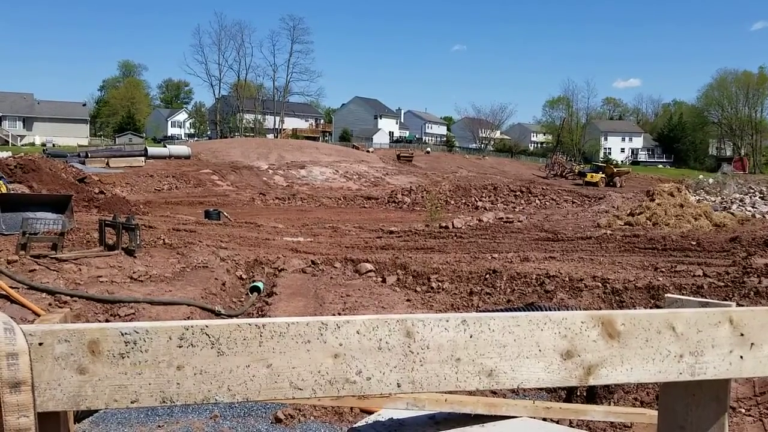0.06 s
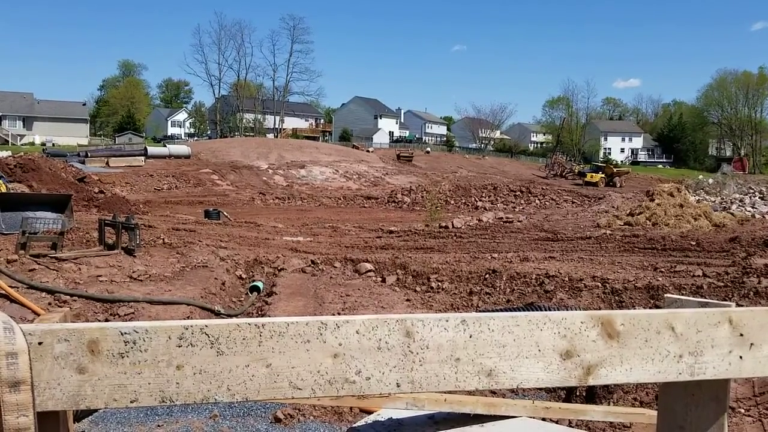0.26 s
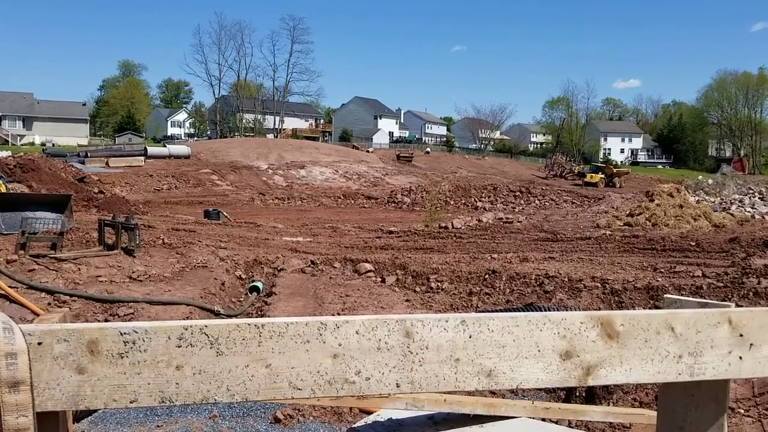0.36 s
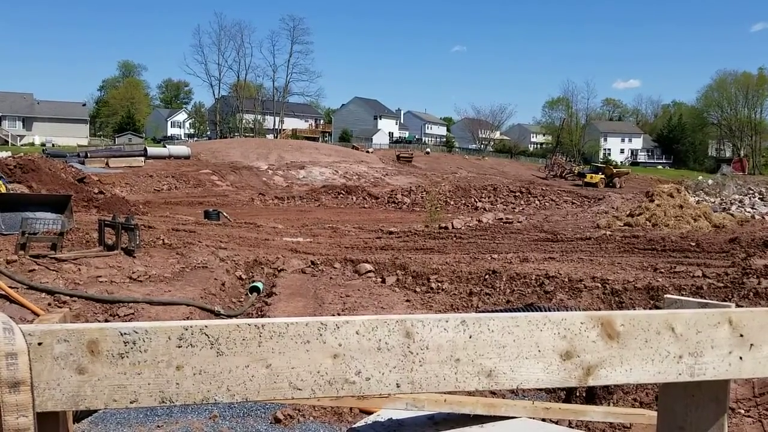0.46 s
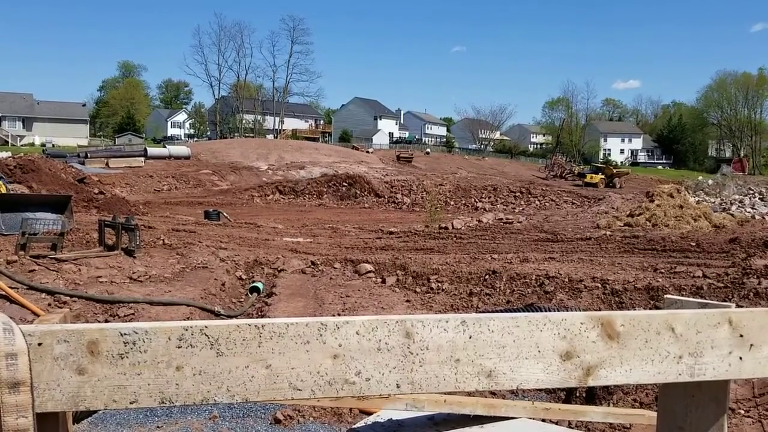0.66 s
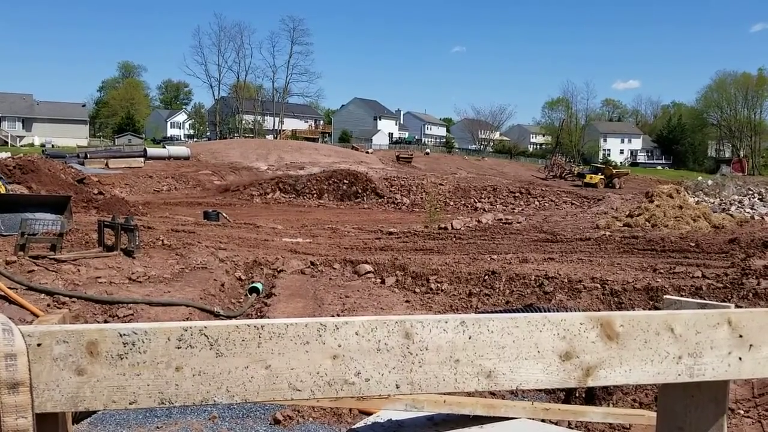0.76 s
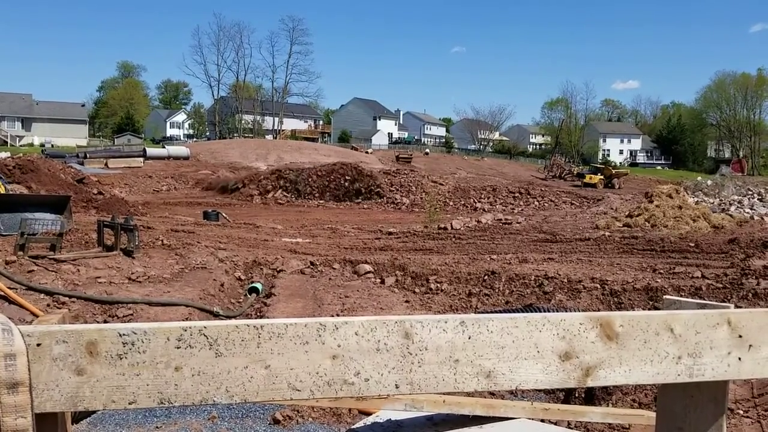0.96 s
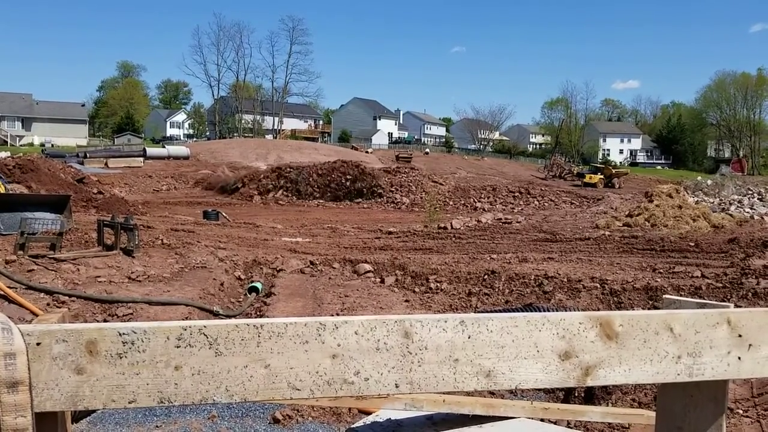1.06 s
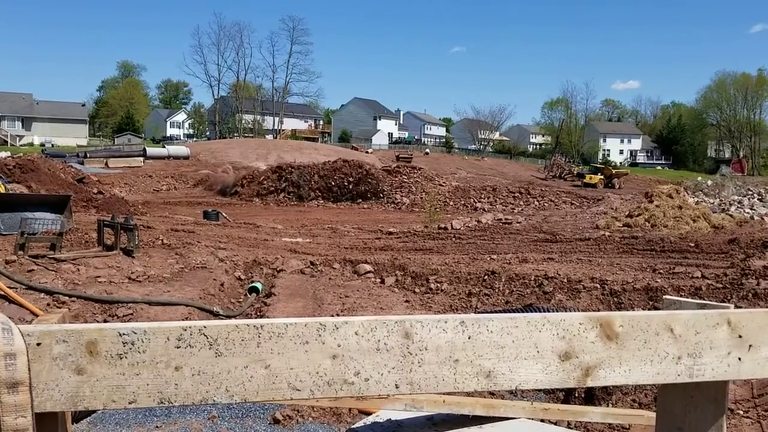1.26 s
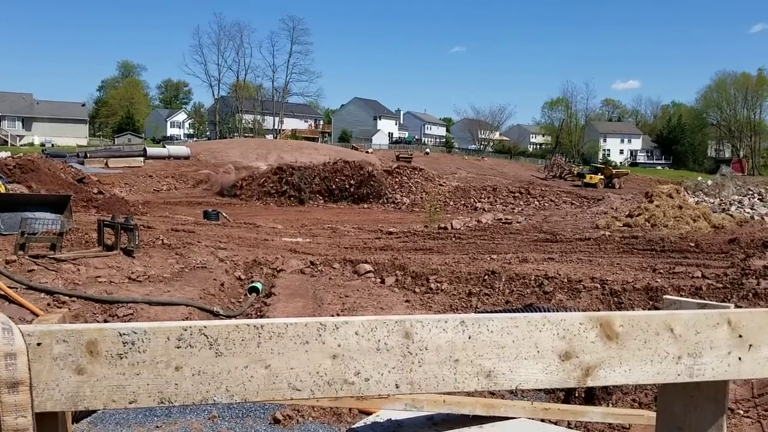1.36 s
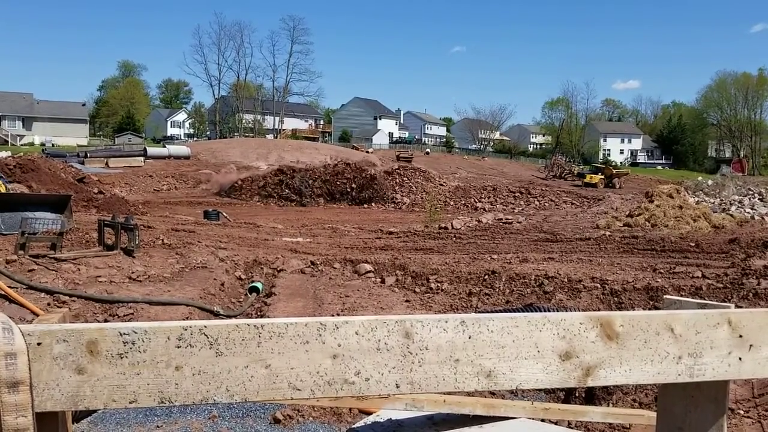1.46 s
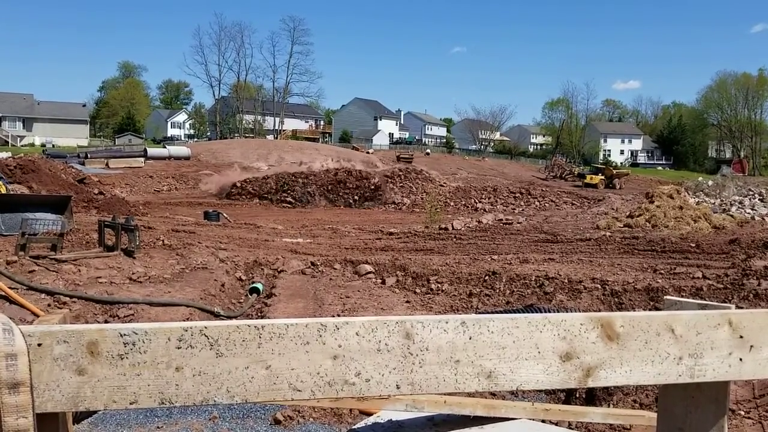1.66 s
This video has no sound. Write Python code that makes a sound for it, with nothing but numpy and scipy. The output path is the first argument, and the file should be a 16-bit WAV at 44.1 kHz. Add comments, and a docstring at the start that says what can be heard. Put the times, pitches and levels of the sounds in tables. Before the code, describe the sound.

A rock blast is heard from across an open building site. After faint outdoor noise and a distant idling machine, sharp detonator cracks snap from about 0.2 to 0.4 seconds. At 0.6 seconds deep thumps and a heavy rumble break out, with more cracks, loudest around 0.7 to 0.9 seconds. The cracks thin out after 1.2 seconds, and the rumble fades into softly sliding rubble by 1.7 seconds.

```python
"""A rock blast across an open building site. Detonators send out sharp shocks that scatter off the
rough ground. A tremor arrives first through the earth, then the charges thump and the heaving rock
rumbles, with more cracks on top. Grit sprays out and rubble starts to slide. Far off, a machine idles
and a bird chirps. An automatic gain control ducks under the blast and creeps back."""
import sys
import numpy as np
from scipy import signal
from scipy.fft import rfft, irfft
from scipy.io import wavfile
from scipy.ndimage import minimum_filter1d

SR = 44100
rng = np.random.default_rng(int(sys.argv[2]) if len(sys.argv) > 2 else 0)


def wrap_up_sound(samples):
    """Save the sound to the file named by the first command line argument, as 16-bit audio."""
    columns = np.atleast_2d(samples).T
    # keep every value between -1 and 1, then stretch to whole-number steps
    tamed = np.clip(columns, -1, 1)
    steps = np.round(tamed * 32767).astype(np.int16)
    wavfile.write(sys.argv[1], SR, steps)


N = 74970

# Detonators and bursting rock. Each row: start in seconds, level in dB, treble edge in Hz, relative
# scatter level in dB, ring pitch in Hz, relative ring level in dB, ring decay in cycles.
CRACK_EVENTS = [(.2398, -2, 6500, -19, 1000, -15, 1.5), (.2713, .5, 5000, -20, 1050, -8, 1.6),
                (.3005, 1.5, 11000, -24.5, 5700, -13, 2), (.3226, 2, 12000, -25, 4100, -11, 4),
                (.3469, -3, 8000, -24, 4000, -9, 1.7), (.3908, 1.5, 10000, -27, 4900, -13, 1.7),
                (.4398, -12, 3000, -18, 1000, -9, 1.7), (.5635, -17, 1100, -22, 950, -9, 1.5),
                (.576, -20, 1800, -23, 1000, -9, 1.5), (.5948, 3, 1300, -26, 1300, -13, 1.3),
                (.6475, -10, 2500, -20, 900, -12, 1.5), (.6555, -15, 6000, -23, 2800, -14, 1.5),
                (.7061, -2, 3500, -24, 1700, -14, 1), (.7077, 8.5, 7500, -22.5, 2300, -12, 1.3),
                (.7238, 9, 4800, -24, 1300, -13, 1), (.7311, 3, 4500, -12.5, 1700, -15, 1),
                (.7838, 9, 11000, -21.5, 1900, -12, 1), (.8372, -3.5, 1700, -21, 1500, -6, 1.3),
                (.8719, 9, 1900, -28, 1400, -9, 1.4), (.885, -8, 2400, -20, 1650, -6, 1.7),
                (.9575, -3, 1100, -26, 750, -10, 1.5), (1.0225, -7.5, 2100, -23, 1100, -11, 1.3),
                (1.0602, 0, 3800, -25, 1080, -3.5, 2.2), (1.1225, -5.5, 2400, -23, 1200, -8, 1.7),
                (1.1777, 3, 1650, -26, 1400, -9, 1.2), (1.319, -18, 1100, -21, 900, -10, 1.5),
                (1.573, -19, 14000, -24, 2000, -15, 1.5)]
# Spectra of the direct shock and of its ground scatter. Each row: frequency in Hz, gain in dB.
SHOCK_SPECTRUM = [(60, -18), (250, -2), (500, -4.5), (1000, 3), (1500, -3), (2200, -4), (3200, -7.5),
                  (5000, -2.5), (7000, -13), (10000, -21), (16000, -26)]
SCATTER_SPECTRUM = [(60, -6), (200, 3), (500, -1), (1100, 2), (2100, -1.5), (3100, -7), (4600, -12.5),
                    (7000, -17.5), (9000, -26.5), (16000, -30)]
# Charges and heaving rock. Each row: start in seconds, level in dB, initial pitch in Hz.
THUMP_EVENTS = [(.243, -12, 130), (.593, 5, 130), (.5945, 0, 330), (.602, 1, 230), (.6205, 7, 125),
                (.664, 5, 100), (.690, 9, 108), (.745, 4, 92), (.796, 4.5, 70), (.832, -5, 170),
                (.891, 2.5, 250), (.897, 1, 125), (.952, 1, 120), (.980, 0, 82), (1.016, -1, 105),
                (1.102, -6, 260), (1.176, 0, 92), (1.284, -12, 85), (1.357, -7, 200), (1.421, -11, 130),
                (1.474, -9, 80)]
# Rumble of the rock mass. Each row: time in seconds, level of the roll in dB, of the tumbling in dB.
RUMBLE_LEVELS = [(0, -76, -73), (.583, -46, -45), (.6, -9.5, -11.5), (.66, -9, -15), (.76, -7.5, -18),
                 (.83, -9, -15), (.9, -9.5, -11), (1.0, -13, -15.5), (1.08, -13, -17), (1.19, -12, -23),
                 (1.23, -19, -27), (1.28, -13, -21), (1.37, -17, -23), (1.48, -19, -29), (1.53, -26, -44),
                 (1.61, -25, -50), (1.7, -40, -50)]
# Spectra of the deep roll and of the tumbling above it. Each row: frequency in Hz, gain in dB.
ROLL_SPECTRUM = [(15, -16), (28, -6), (45, -2), (65, 0.5), (85, -6), (105, 0.5), (135, -11), (180, -22.5),
                 (400, -44), (1000, -87)]
TUMBLE_SPECTRUM = [(60, -32), (120, -4), (160, -3), (250, 1), (320, -10), (450, -14), (700, -22.5),
                   (1500, -30.5), (4000, -61)]
# Envelopes of the ground wave and of grit, then sliding rubble. Each row: time in seconds, level in dB.
TREMOR_LEVELS = [(0, -80), (.435, -50), (.455, -18), (.475, -17), (.492, -26), (.51, -19), (.56, -18),
                 (.6, -24), (.65, -60), (1.7, -80)]
RUBBLE_LEVELS = [(0, -90), (.38, -50), (.45, -38), (.585, -44), (.6, -29), (.66, -36), (.85, -34),
                 (1.05, -38), (1.25, -36), (1.38, -37), (1.54, -31.5), (1.7, -29)]
# Spectra of the rubble, the grit spray and the open air. Each row: frequency in Hz, gain in dB.
RUBBLE_SPECTRUM = [(100, -8), (250, -4), (450, 0), (750, -3), (950, 1), (1400, -6), (2200, -4.5),
                   (3000, -12), (4200, -13), (7000, -24.5), (10000, -31), (16000, -42)]
SPRAY_SPECTRUM = [(1500, -20), (3500, -3), (5300, 0), (7500, -11), (10000, -18), (16000, -30)]
AIR_SPECTRUM = [(20, -16), (60, -3), (140, 0.5), (240, -1), (400, -10), (700, -14), (1300, -18),
                (3000, -27.5), (5000, -28), (7500, -39), (8900, -41), (9300, -37.5), (9900, -44),
                (13700, -43), (14200, -32), (14900, -41)]
# Partials of the idling machine. Each row: frequency in Hz, level in dB.
IDLE_PARTIALS = [(65, -34), (134.6, -37), (231.5, -44)]
# Chirps of the far bird. Each row: start in seconds, level in dB.
CHIRP_EVENTS = [(.035, -50), (.068, -50), (.158, -48), (.218, -50), (.52, -43), (.582, -46)]
# Response of the two microphone ports. Each row: frequency in Hz, left gain in dB, right gain in dB.
PORT_RESPONSE = [(100, 0.98, -0.73), (1200, 0.5, 0), (2400, 1, 4.5), (3100, 1.5, -2.5), (3800, 8, -2),
                 (5200, 6, -3), (7000, 5.5, -9), (8200, 1.5, 0.5), (9200, -4, 12), (10200, 0, 2),
                 (15000, -4, 2)]

TIME = np.arange(N) / SR
EVENT_TIME = TIME[:int(.4 * SR)]  # seconds into one crack or thump
TOP_HZ = 15800


def cracks(close_s=.0025, scatter_s=.02, echo_s=.11, port_lag_s=.00005):
    """Reflection: each ringing shock is followed by close returns, ground scatter and a faint echo."""
    shock = impulse_response(response(SHOCK_SPECTRUM, size=1024))
    shock /= np.abs(shock).max()
    t = EVENT_TIME
    fade = undb(4) * np.exp(-t / close_s) + np.exp(-t / scatter_s) + undb(-20) * np.exp(-t / echo_s)
    ground = noise(SCATTER_SPECTRUM) * grain(spread_db=2.3)
    direct, scatter = np.zeros(N), np.zeros((2, N))
    for start, db, edge_hz, scatter_db, ring_hz, ring_db, ring_cycles in CRACK_EVENTS:
        add(direct, start, undb(db) * lowpass(shock, edge_hz))
        add(direct, start, undb(db + ring_db) * damped_sine(ring_hz, ring_cycles))
        offset = rng.integers(N - len(t))
        tail = lowpass(fade * ground[:, offset:offset + len(t)], 2 * edge_hz)
        # The scatter carries the ring of its own crack.
        tail_ring = signal.lfilter(*signal.iirpeak(ring_hz, Q=3, fs=SR), tail)
        add(scatter, start, undb(db + scatter_db) * (tail + undb(ring_db + 3) * tail_ring))
    right = np.interp(TIME - port_lag_s, TIME, direct)  # the shock reaches the left port first
    return np.array([direct, right]) + scatter


def thumps(sag_share=.2, sag_s=.02, rise_cycles=.5):
    """Volume displacement: each heave pushes the air in a low, damped swing that sinks in pitch."""
    out = np.zeros(N)
    sag = 1 - sag_share * (1 - np.exp(-EVENT_TIME / sag_s))
    for start, db, hz in THUMP_EVENTS:
        cycles = np.cumsum(hz * sag) / SR
        swell = cycles / rise_cycles
        add(out, start, undb(db) * np.sin(2 * np.pi * cycles) * swell * np.exp(1 - swell))
    return out


def rumble():
    """Irregular motion radiates noise: broken rock lifts and falls back, rolling and tumbling."""
    roll = noise(ROLL_SPECTRUM) * envelope(RUMBLE_LEVELS, column=1)
    tumble = noise(TUMBLE_SPECTRUM) * envelope(RUMBLE_LEVELS, column=2)
    return roll + tumble


def tremor(hz=61):
    """Sound travels faster in earth than in air: a low, unsteady ground wave outruns the air blast."""
    phase = 2 * np.pi * hz * TIME + .4 * walk(20)
    return envelope(TREMOR_LEVELS) * np.sqrt(2) * np.sin(phase)


def snaps(count=26, from_s=.5, to_s=1.25, centre_hz=1300):
    """Brittle fracture: breaking rock rings in small snaps, scattered in time, level and pitch."""
    out = np.zeros(N)
    starts = rng.uniform(from_s, to_s, count)
    for start, (size, pitch) in zip(starts, rng.standard_normal((count, 2))):
        snap = damped_sine(centre_hz * 2 ** (pitch / 2), decay_cycles=1.7)
        add(out, start, undb(-25 + 3 * size) * snap)
    return out


def rubble():
    """Incoherent addition: countless sliding stones and bits of grit merge into a grainy rush."""
    return noise(RUBBLE_SPECTRUM) * grain(spread_db=2) * envelope(RUBBLE_LEVELS)


def spray(start_s=.595, decay_s=.025):
    """Grit shot out by the first charge makes a noise transient, a hiss that decays exponentially."""
    out = np.zeros((2, N))
    hiss = noise(SPRAY_SPECTRUM) * grain(spread_db=3.5)
    add(out, start_s, undb(-37) * np.exp(-TIME / decay_s) * hiss)
    return out


def machine(waver=.25):
    """Amplitude and phase modulation make the partials of a distant idling machine waver."""
    hum = np.zeros(N)
    for hz, db in IDLE_PARTIALS:
        amplitude = undb(db) * np.sqrt(2) * (1 + waver * walk(12))
        hum += amplitude * np.sin(2 * np.pi * hz * TIME + waver * walk(9))
    return hum


def air():
    """The open air is a diffuse field of low noise whose level flutters slightly."""
    return undb(-31 + .8 * walk(15)) * noise(AIR_SPECTRUM)


def bird(hz=8600, chirp_s=.022, waver=.025):
    """Frequency modulation gives each thin, high chirp of a far bird its own waver."""
    gate, swell = np.zeros(N), np.hanning(int(chirp_s * SR))
    pitch = hz * (1 + waver * walk(120))
    for start, db in CHIRP_EVENTS:
        add(gate, start, undb(db) * swell)
    return gate * np.sin(2 * np.pi * np.cumsum(pitch) / SR)


def undb(db):
    """Amplitude grows tenfold for every 20 dB."""
    return 10 ** (np.asarray(db) / 20)


def envelope(rows, column=1):
    """Gain over time, interpolated in decibels."""
    rows = np.array(rows)
    return undb(np.interp(TIME, rows[:, 0], rows[:, column]))


def response(rows, size, column=1):
    """Gain over frequency, interpolated in decibels on a logarithmic frequency axis."""
    rows = np.array(rows, float)
    hz = np.maximum(np.fft.rfftfreq(size, 1 / SR), 1)
    return undb(np.interp(np.log(hz), np.log(rows[:, 0]), rows[:, column]))


def impulse_response(gain):
    """Minimum phase: the most compact causal response with these gains."""
    cepstrum = irfft(np.log(gain))
    half = len(cepstrum) // 2
    cepstrum[1:half] *= 2
    cepstrum[half + 1:] = 0
    return irfft(np.exp(rfft(cepstrum)))[:half]


def damped_sine(hz, decay_cycles, size=2048):
    """Free vibration: the amplitude falls to 1/e in decay_cycles."""
    cycles = hz * np.arange(size) / SR
    return np.sin(2 * np.pi * cycles) * np.exp(-cycles / decay_cycles)


def noise(spectrum, apart_hz=1600):
    """A diffuse field of rms 1: the two channels are coherent in the bass, unrelated above apart_hz."""
    mid, side = rfft(rng.standard_normal((2, N))) * response(spectrum, N)
    apart = np.minimum(np.fft.rfftfreq(N, 1 / SR) / apart_hz, 1)
    channels = np.array([mid + apart * side, mid - apart * side])
    x = irfft(channels / np.sqrt(1 + apart ** 2), N)
    return x / x.std()


def walk(rate_hz):
    """Band-limited random fluctuation with a spread of 1."""
    smoothing = np.exp(-(np.fft.rfftfreq(N, 1 / SR) / rate_hz) ** 2)
    x = irfft(rfft(rng.standard_normal(N)) * smoothing, N)
    return x / x.std()


def grain(spread_db, length_s=.003):
    """Random amplitude modulation: a quickly flickering gain of rms 1."""
    gain = undb(spread_db * walk(1 / length_s))
    return gain / np.sqrt(np.mean(gain ** 2))


def lowpass(x, hz):
    """Second-order roll-off above hz, or above TOP_HZ if that is lower."""
    return signal.lfilter(*signal.butter(2, min(hz, TOP_HZ), fs=SR), x)


def add(out, start, x):
    """Superpose x on out from start seconds on."""
    part = out[..., max(int(start * SR), 0):][..., :x.shape[-1]]
    part += x[..., :part.shape[-1]]


def duck(x, threshold_db=-23, share=.42, sense_s=.02, hold_s=.42, recover_db_per_s=19):
    """Compression: the gain drops by a share of the excess level, holds, then recovers steadily."""
    memory = np.exp(-1 / (sense_s * SR))
    power = signal.lfilter([1 - memory], [1, -memory], np.mean(x ** 2, axis=0))
    cut_db = share * np.maximum(10 * np.log10(power + 1e-12) - threshold_db, 0)
    half = int(hold_s * SR / 2)
    held_db = -minimum_filter1d(-cut_db, 2 * half + 1, origin=half, mode="constant")
    ramp_db = recover_db_per_s * TIME
    return x * undb(ramp_db - np.maximum.accumulate(held_db + ramp_db))


def scene():
    """Superposition: the pressures of all sources add at the two ports."""
    blast = cracks() + snaps() + thumps() + rumble() + tremor()
    return blast + rubble() + machine() + air() + spray() + bird()


def record(dry):
    """Filtering and saturation: port colour, a low cut, gain control, rounded peaks, a steep top cut."""
    ports = np.zeros((2, N))
    for side in range(2):
        colour = impulse_response(response(PORT_RESPONSE, size=1024, column=side + 1))
        ports[side] = signal.oaconvolve(dry[side], colour)[:N]
    low_cut = signal.butter(1, 12, "high", fs=SR)
    ducked = duck(signal.lfilter(*low_cut, ports))
    rounded = ducked / (1 + ducked ** 4) ** .25
    top_cut = signal.ellip(10, .2, 100, TOP_HZ, fs=SR, output="sos")
    return signal.sosfilt(top_cut, rounded)


dry = scene()
out = record(dry)
wrap_up_sound(out)
```